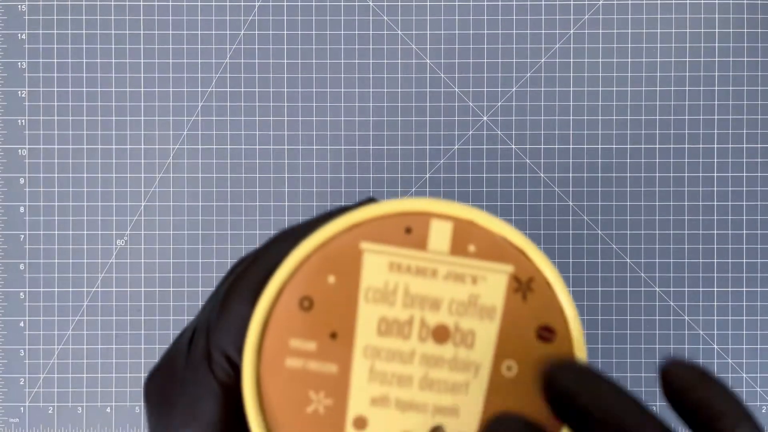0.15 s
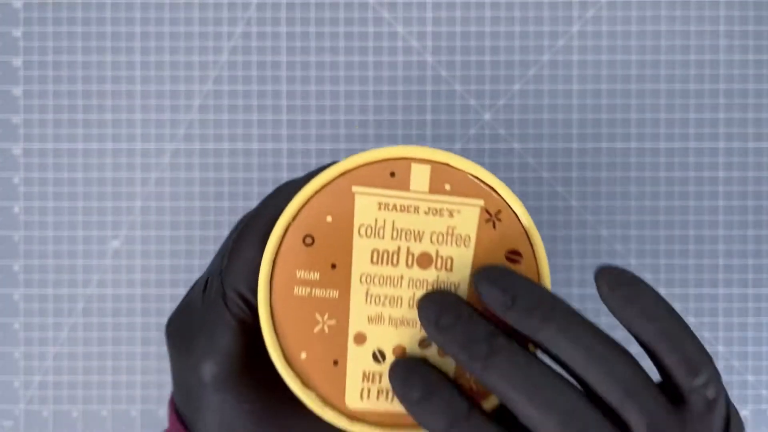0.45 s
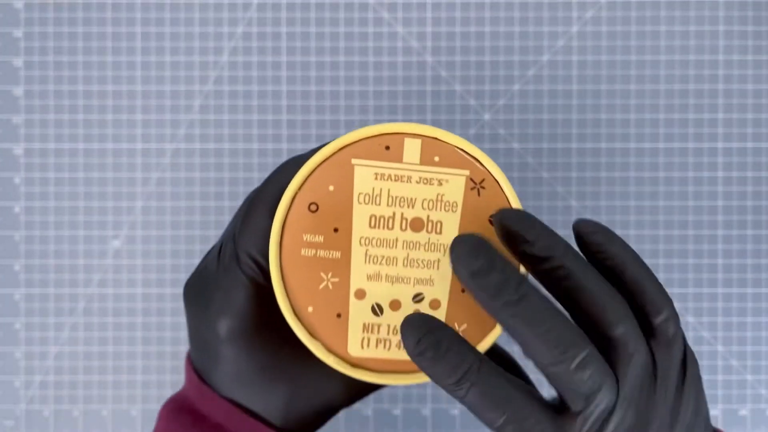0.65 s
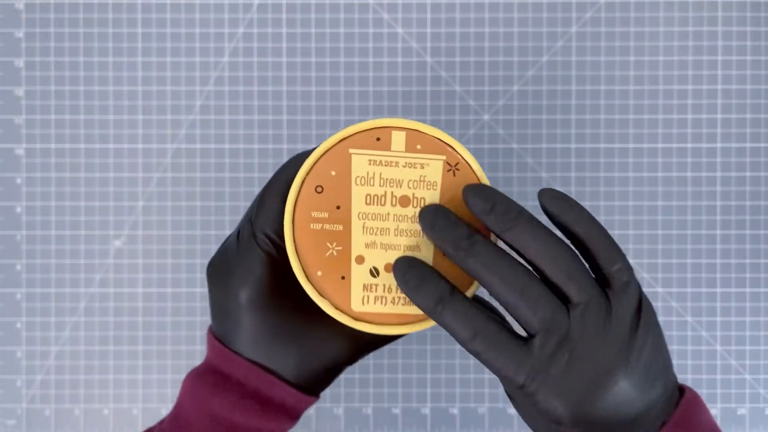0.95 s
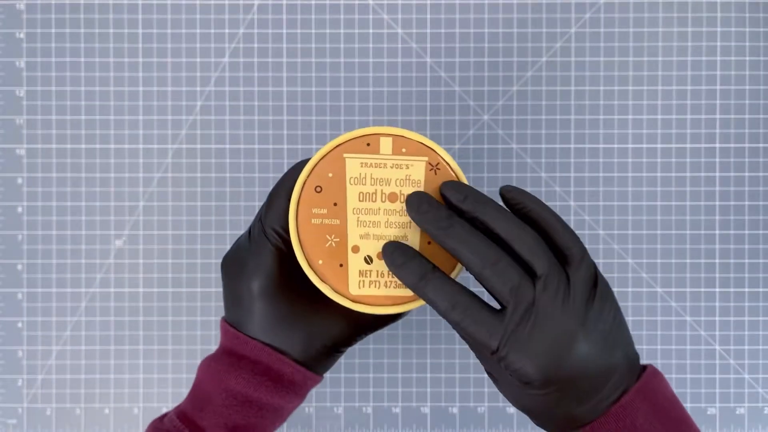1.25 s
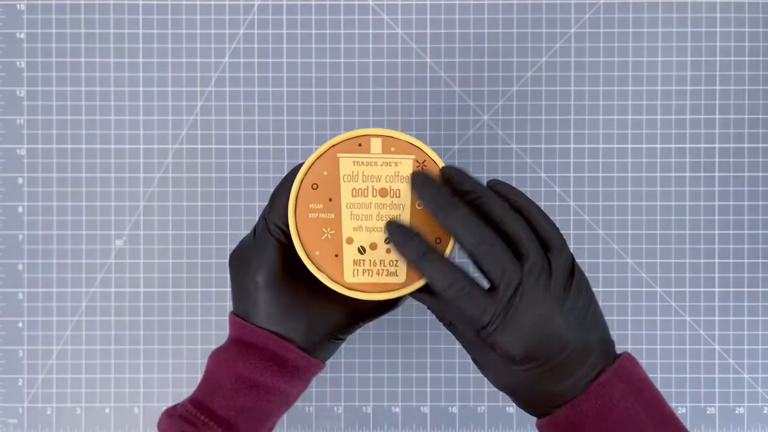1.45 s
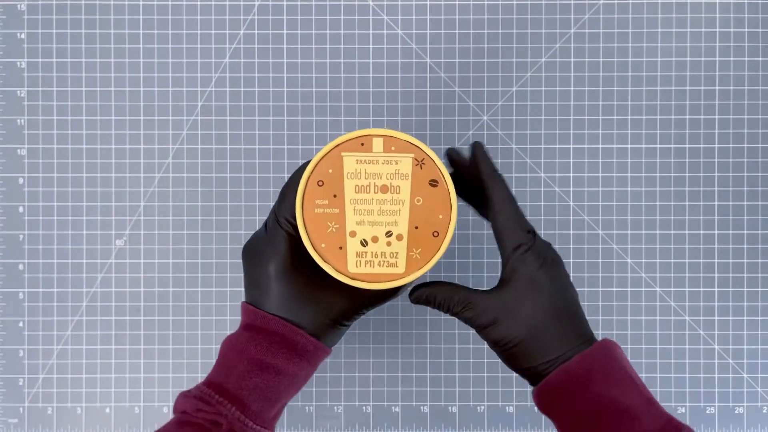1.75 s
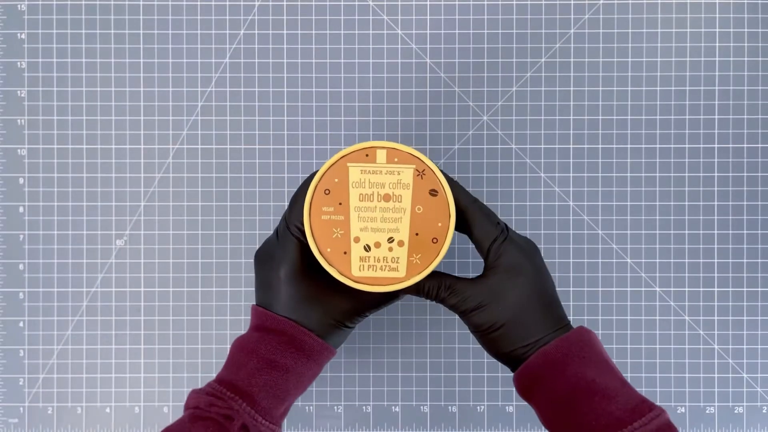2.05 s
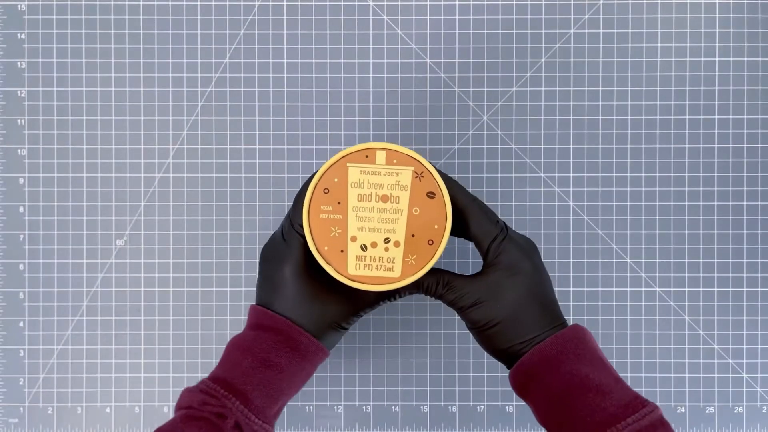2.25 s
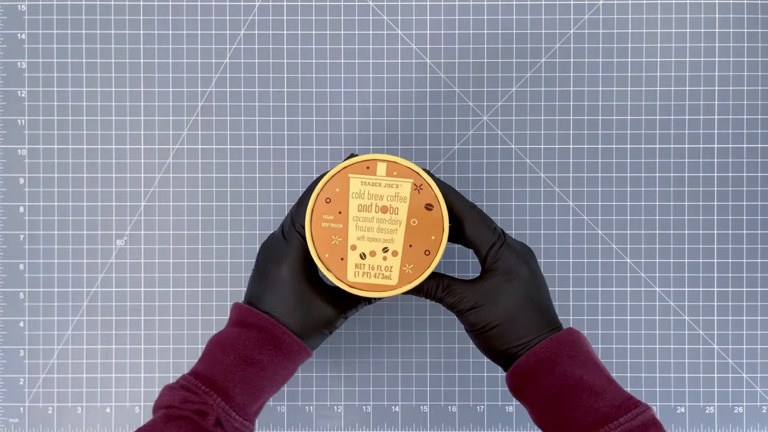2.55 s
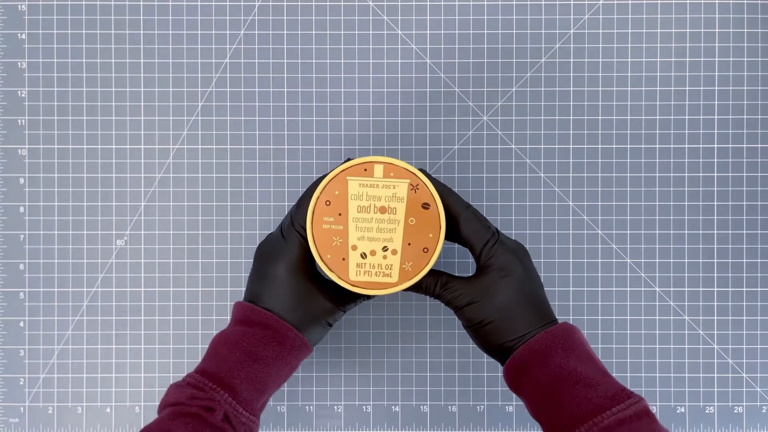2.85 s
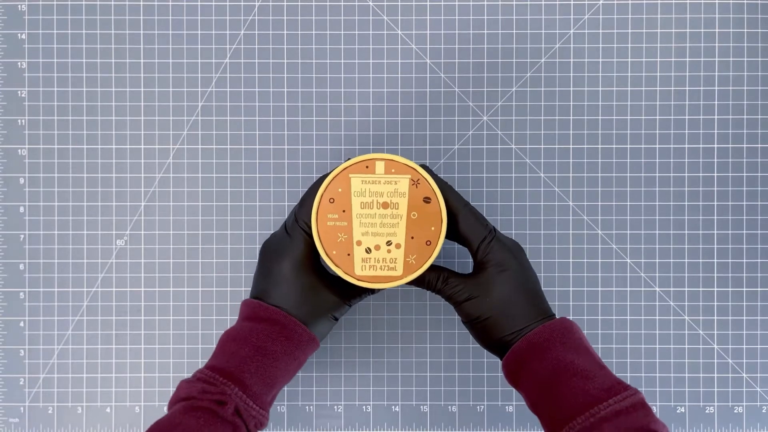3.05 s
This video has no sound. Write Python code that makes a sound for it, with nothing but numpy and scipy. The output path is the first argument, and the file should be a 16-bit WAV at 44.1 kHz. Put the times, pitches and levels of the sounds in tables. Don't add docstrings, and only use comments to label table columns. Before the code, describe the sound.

Finger taps on a cardboard tub, small rubber glove ticks, then one heavy table thump

```python
import sys
import numpy as np
from scipy import signal
from scipy.fft import rfft, irfft
from scipy.io import wavfile
from scipy.ndimage import uniform_filter1d, map_coordinates

SR = 44100
rng = np.random.default_rng(int(sys.argv[2]) if len(sys.argv) > 2 else 0)


def wav_out(sig):
    wavfile.write(sys.argv[1], SR, np.round(np.clip(np.atleast_2d(sig).T, -1, 1) * 32767).astype(np.int16))


def decibels_to_gain(level_db):
    exponent = np.asarray(level_db, float) / 20
    return 10 ** exponent


N = 141120

# start_s, level_db
HUM = [(0.0, -56.5), (1.35, -62), (1.55, -60), (1.72, -62.5), (2.25, -62), (2.45, -65), (2.82, -62.5),
       (3.0, -65)]
# pitch_hz, density_db (per Hz)
HUM_TONE = [(60, -32), (100, -17), (130, -5.5), (200, -2.5), (290, -6.5), (355, -0.5), (400, -8.5),
            (480, -12), (800, -32.5)]
# pitch_hz, density_db (per Hz)
AIR_TONE = [(290, -48), (500, -6.5), (631, -3.5), (731, -5), (2120, -14), (2450, -11), (11000, -17),
            (12800, -11.5), (16400, -24.5)]
# pitch_hz, density_db (per Hz)
RUMBLE_TONE = [(15, -11.5), (26, 1), (42, -13.5), (50, -16), (61, -5), (76, -17), (130, -16)]
# pitch_hz, density_db (per Hz)
WHINE_TONE = [(1950, -20), (2120, 1.5), (2300, -14.5)]
# delay_s, level_db, smear_s
ECHOES = [
    (0.012, -15.5, 0.001),
    (0.022, -24.5, 0.0014),
]
# start_s, level_db, pan_db (left over right)
RUSTLE = [(0, -62.5, 5), (.1, -61, 1.5), (.3, -55.5, 1), (.5, -58, 1.5), (.75, -56.5, -0.5),
          (.95, -62, 3.5), (1.2, -61.5, -1.5), (1.47, -64.5, 4), (1.65, -60, 0), (1.84, -63, 2.5),
          (2.05, -64, 2), (2.25, -63, 0.5), (2.45, -68, 1.5), (2.9, -69, 3.5), (3.04, -63, 3.5),
          (3.2, -69.5, -2.5)]
# pitch_hz, density_db (per Hz)
RUSTLE_TONE = [(710, -47.5), (1200, -12), (2020, -8.5), (2250, -8.5), (3250, -6.5), (4550, -5),
               (8530, -12.5), (14200, -27), (16000, -37.5)]
# centre_s, level_db, length_s
SWISH = [
    (1.613, -68, 0.061),
    (1.898, -57, 0.026),
]
# pitch_hz, density_db (per Hz)
SWISH_TONE = [(2500, 1), (9500, 0.5), (13000, 1), (16000, -6.5)]
# pitch_hz, density_db (per Hz)
RUB_TONE = [(1800, -14), (2700, -7), (3400, 1), (4700, -1.5), (6000, -6.5), (8000, -19), (12000, -13.5),
            (16000, -19)]
# start_s, level_db, pitch_hz, pan_db (left over right)
TICKS = [(.016, -40.5, 4900, 6), (.523, -49.5, 4960, -36), (.605, -45.5, 4020, 8), (.870, -33, 5100, -4),
         (1.5176, -29, 3400, -11), (1.5191, -33, 4450, -11), (1.676, -46.5, 1780, -4),
         (1.947, -55.5, 1305, -2), (.644, -43.5, 3980, 1), (2.3041, -37.5, 5940, 5), (2.3039, -43, 4400, 3),
         (2.3042, -42, 8700, 3), (2.3046, -51.5, 2200, 0), (1.5178, -36, 2540, -8.5),
         (1.518, -39, 5800, -9), (1.755, -55.5, 1500, -1), (2.3046, -39.5, 12300, 15),
         (0.459, -53, 3500, 3), (.745, -52, 2800, 5), (1.049, -56, 2490, -3), (1.089, -63, 3960, 0),
         (2.80, -57, 3800, -0.5), (2.865, -52, 3800, -5), (2.955, -53, 5000, 0)]
# pitch_hz, density_db (per Hz)
SNAP_TONE = [(1500, -9.5), (4000, 7.5), (9000, -7.5), (16000, -11.5)]
# start_s, level_db, push_s, direction (sign)
LANDINGS = [
    (3.0626, -7.5, 0.00082, 1),
    (3.075, -11, 0.0018, -1),
]
# pitch_hz, level_db, t60_s
TABLE_MODES = [(91.5, -16, 0.4), (119.4, -15, 0.34), (136.6, -11, 0.64), (157.6, -13.5, 0.11),
               (179.6, 1.5, 0.13), (183.5, -12, 0.58), (190.6, -1, 0.12), (238, -5.5, 0.17),
               (316, 1, 0.033), (281, -25, .4), (363, -14.5, 0.29), (431, -26.5, 0.14), (594, -16, 0.081)]
# pitch_hz, density_db (per Hz)
LAND_CRACK_TONE = [(500, -3.0), (1200, -4.5), (2600, -17.5), (5500, -18.5), (9000, -31), (14000, -41)]
# pitch_hz, density_db (per Hz)
LAND_HISS_TONE = [(2500, -10), (4000, 2), (6500, -5), (8000, -18)]
# start_s, level_db, pitch_hz (lid), hold_s (until the finger mutes it), crack_db (over the tap)
TAPS = [(.1846, -22.5, 1330, 0.0037, -11), (0.282, -29, 1313, 0.0085, -1), (0.3708, -21, 1440, 0.0032, -8),
        (.644, -42.5, 1560, 0.0013, -17), (0.678, -35.5, 1165, 0.0054, -2), (.774, -31, 1245, 0.0094, -4.5),
        (.801, -53.5, 1520, 0.002, 12.5), (0.8726, -8, 1290, 0.0011, -17.5),
        (0.875, -24.5, 1530, 0.0012, -30), (1.1625, -37.5, 1120, 0.0027, -2.5),
        (1.2129, -27, 1690, 0.0043, -5.5), (1.2156, -21.5, 1070, 0.00092, -37),
        (1.2182, -18.5, 1227, 0.0028, -11.5), (1.397, -43, 1205, 0.0069, -29)]
# pitch_hz, density_db (per Hz)
CRACK_TONE = [(1900, -13), (2500, -2), (3200, -1), (5500, -4.5), (8000, -8.5), (10500, -15.5),
              (13000, -17.5), (16000, -19)]
# start_s,
# level_db, pitch_hz, t60_s
BODY_MODES = [(0.185, -42.5, 210, 0.059), (0.185, -34.5, 756, 0.042), (.281, -42.5, 235, 0.056),
              (.282, -36, 3050, 0.03), (.371, -33.5, 390, 0.016), (.404, -36, 336, 0.041),
              (0.89, -36.5, 810, 0.025), (.7762, -32.5, 1300, 0.018), (1, -44.5, 286, .05),
              (0.8, -32, 630, 0.019), (1.168, -46, 1350, 0.045), (.30, -42, 1680, 0.05),
              (.7995, -48, 380, 0.024), (.801, -54, 1800, 0.023), (.801, -48.5, 2300, 0.01554),
              (.282, -42, 740, 0.057), (.775, -41, 3250, .015), (.775, -41.5, 1820, 0.026),
              (.382, -47, 320, 0.018), (.513, -51.5, 1200, 0.02), (.52, -49, 560, 0.026),
              (.745, -49, 400, 0.035), (1.2135, -31.5, 840, 0.016), (1.219, -31.5, 324, 0.011),
              (.69, -48.5, 87, .08), (0.873, -29.5, 148, 0.04), (.873, -22.5, 1020, 0.016),
              (.987, -45, 555, 0.056), (1.218, -37.5, 150, 0.008), (1.396, -48, 577, 0.089),
              (1.162, -53, 820, 0.074), (.874, -38.5, 385, 0.05), (.282, -36.5, 540, 0.027),
              (.372, -33.5, 810, 0.033), (2.798, -52.5, 780, 0.012), (2.842, -50, 500, 0.01),
              (2.875, -54.5, 770, 0.015),
              (0.185, -31.5, 2520, 0.0081), (0.369, -40, 2470, 0.022), (.873, -22, 2750, 0.0044),
               (.874, -32.5, 1740, 0.0072), (1.214, -29.5, 2600, 0.0049), (1.219, -52, 2800, 0.0086),
               (0.678, -41.5, 1623, 0.026), (3.063, -27.5, 2370, .014), (3.063, -27, 1700, 0.015),
               (3.064, -38, 3140, .015), (3.066, -28, 608, 0.068), (3.064, -30.5, 1160, 0.048),
               (3.072, -36.5, 1490, .05), (3.072, -41, 1923, 0.052)]


def unit(x):
    return x / np.sqrt(np.mean(x ** 2))


def ring(t, hz, t60):
    return np.sin(2 * np.pi * hz * t) * decay(t, t60)


def decay(t, t60):
    return 10 ** (-3 * t / t60)


def push(x, seconds):
    phase = (np.arange(SR // 100) + 0.5) / (seconds * SR)
    force = np.sin(np.pi * np.clip(phase, 0, 1))
    return signal.lfilter(force / force.sum(), 1, x)


def add(out, start_s, x, level_db):
    i = int(start_s * SR)
    x = x[:N - i]
    out[..., i:i + len(x)] += decibels_to_gain(level_db) * x / np.abs(x).max()


def highpass(x, hz):
    return signal.lfilter(*signal.butter(2, hz, "high", fs=SR), x)


def sides(pan_db):
    return np.array([[pan_db], [-pan_db]]) / 2


def walk(rate_hz):
    k = int(SR / rate_hz)
    steps = np.repeat(rng.standard_normal(N // k + 1), k)
    smooth = uniform_filter1d(uniform_filter1d(steps, k), k)
    return unit(smooth[:N])


def colour(tone, x):
    hz, tone = np.fft.rfftfreq(x.shape[-1], 1 / SR) + 1, np.array(tone)
    gain_db = np.interp(np.log(hz), np.log(tone[:, 0]), tone[:, 1], left=-60, right=-60)
    return irfft(rfft(x) * decibels_to_gain(gain_db), x.shape[-1])


def noise(tone, likeness):
    mid, side = colour(tone, rng.standard_normal((2, N)))
    c = np.clip(likeness, -1, 1)
    return unit(np.sqrt(1 + c) * mid + np.sqrt(1 - c) * side * np.array([[1], [-1]]))


def curve(table, column):
    table = np.array(table)
    return np.interp(np.arange(N) / SR, table[:, 0], table[:, column])


def rumble():
    return decibels_to_gain(-62.5) * noise(RUMBLE_TONE, 0.77)


def hum():
    return noise(HUM_TONE, 0.86) * decibels_to_gain(curve(HUM, 1) - 2.5 + walk(10.0))


def air():
    return decibels_to_gain(-66.5) * noise(AIR_TONE, 0.053)


def fan_whine():
    return decibels_to_gain(-76.5) * noise(WHINE_TONE, 1)[0]


def room(x, level_db):
    t = np.arange(16000) / SR
    fade = decay(t, 0.33) * np.clip(t / 0.00394, 0, 1)
    shape = decibels_to_gain(level_db) * fade / np.linalg.norm(fade)
    for delay_s, echo_db, smear_s in ECHOES:
        bump = np.exp(-((t - delay_s) / smear_s) ** 2)
        shape = np.hypot(shape, decibels_to_gain(echo_db) * bump / np.linalg.norm(bump))
    absorb = signal.butter(1, 6240, fs=SR)
    mid, side = signal.lfilter(*absorb, rng.standard_normal((2, len(t))))
    tail = unit(mid + 0.91 * side * np.array([[1], [-1]])) * shape
    return signal.fftconvolve(x[None], tail, axes=1)[:, :N]


def rustle():
    t = np.arange(N) / SR
    grain = decibels_to_gain(walk(30) + 2 * walk(900))
    pan_db = curve(RUSTLE, 2)
    level = decibels_to_gain(curve(RUSTLE, 1) + np.array([pan_db, -pan_db]) / 2)
    slide = noise(RUSTLE_TONE, 0.16) * grain * level
    swish = sum(decibels_to_gain(db) * np.exp(-((t - s) / length_s) ** 2) for s, db, length_s in SWISH)
    return slide + swish * noise(SWISH_TONE, 0.21)


def rub():
    t = np.arange(N) / SR - 1.569
    rise_s, fall_s = 0.076, 0.19
    swell = np.exp(-(t / np.where(t < 0, rise_s, fall_s)) ** 2) * decibels_to_gain(walk(37.95))
    return noise(RUB_TONE, 0.12) * swell * decibels_to_gain(-53.5 + sides(-8.5))


def ticks():
    out, t = np.zeros((2, N)), np.arange(1000) / SR
    cycles, snap_db = 4.7, -20.5
    snaps = unit(colour(SNAP_TONE, rng.standard_normal((len(TICKS), len(t)))))
    for (s, db, hz, pan_db), snap in zip(TICKS, snaps):
        tick = ring(t, hz, cycles * 2 / hz) * np.clip(t * hz, 0, 1)
        tick = tick + decibels_to_gain(snap_db) * snap * decay(t, 0.0041)
        add(out[0], s, tick, db + pan_db / 2)
        add(out[1], s, tick, db - pan_db / 2)
    return out


def thump():
    out, t = np.zeros(N), np.arange(8000) / SR
    boom = highpass(sum(decibels_to_gain(db) * ring(t, hz, t60) for hz, db, t60 in TABLE_MODES), 180)
    for s, db, push_s, direction in LANDINGS:
        add(out, s, np.sign(direction) * push(boom, push_s), db)
    land_s = LANDINGS[0][0]
    crack = colour(LAND_CRACK_TONE, rng.standard_normal(len(t))) * decay(t, 0.05)
    add(out, land_s, push(crack, 0.0001), -25)
    hiss = colour(LAND_HISS_TONE, rng.standard_normal(len(t))) * decay(t, 0.5)
    add(out, land_s, hiss, -49)
    return out


def taps():
    out, t = np.zeros(N), np.arange(8000) / SR
    cracks = colour(CRACK_TONE, rng.standard_normal((len(TAPS), len(t))))
    cracks = cracks * decay(t, 0.02) * np.clip(t / 0.00096, 0, 1)
    after_ring = decibels_to_gain(-22.5) * ring(t, 1234, 0.066)
    for (s, db, hz, hold_s, crack_db), crack in zip(TAPS, cracks):
        muting = np.exp(-(t / hold_s) ** 4)
        onset = 1 - np.exp(-t / 0.00024)
        lid = ring(t, hz, 0.036) * muting * onset + after_ring
        add(out, s, push(lid, 0.00033), db)
        add(out, s, crack, db + crack_db)
    for s, db, hz, t60 in BODY_MODES:
        add(out, s, push(ring(t, hz, t60), 0.65 / hz), db)
    return highpass(out, 110)


def table_bounce(tap):
    out = tap.copy()
    add(out, 0.0097, tap, -15.5 + 20 * np.log10(np.abs(tap).max()))
    return out


def treble_spread(hits):
    treble = signal.filtfilt(*signal.butter(2, 1900, "high", fs=SR), hits)
    return decibels_to_gain(-2.5) * signal.hilbert(treble).imag


def scene():
    tap, land, tick = table_bounce(taps()), thump(), ticks()
    lag_s = 0.00002
    late = map_coordinates(tap, [np.arange(N) - lag_s * SR], mode="nearest")
    near = np.array([late, tap]) * decibels_to_gain(sides(-1.5)) + land * decibels_to_gain(sides(0.6))
    near += (treble_spread(tap + land) + fan_whine()) * np.array([[1], [-1]])
    to_room = tap + decibels_to_gain(6.0) * highpass(land, 420) + decibels_to_gain(-10.0) * tick.mean(0)
    background = rumble() + hum() + air()
    return background + room(to_room, -14.5) + rustle() + rub() + tick + near


def band_limit(x):
    return signal.sosfilt(signal.butter(12, 16500, fs=SR, output="sos"), x)


def record(dry):
    top = signal.ellip(8, 0.2, 60, 16350, fs=SR, output="sos")
    mix = signal.sosfilt(top, dry)
    return band_limit(mix)


dry = scene()
out = record(dry)
wav_out(out)
```